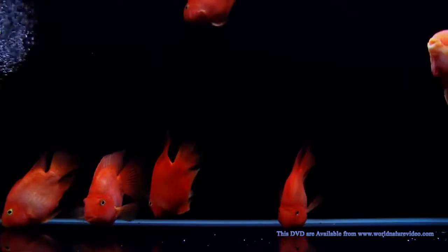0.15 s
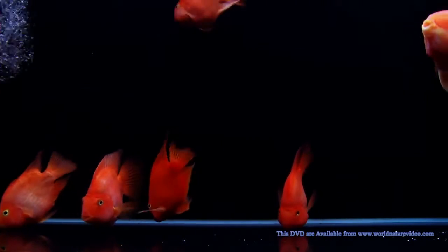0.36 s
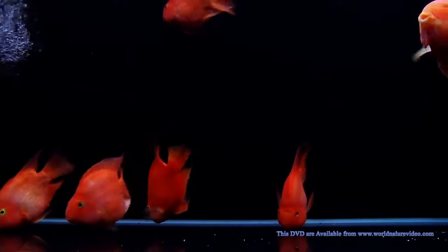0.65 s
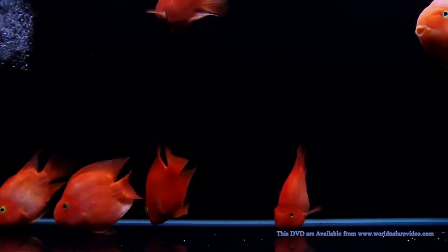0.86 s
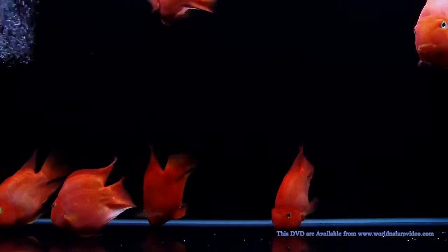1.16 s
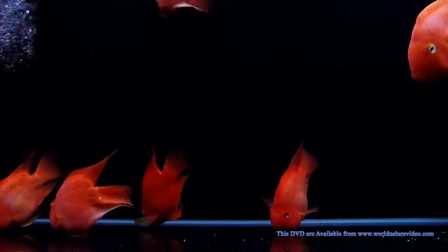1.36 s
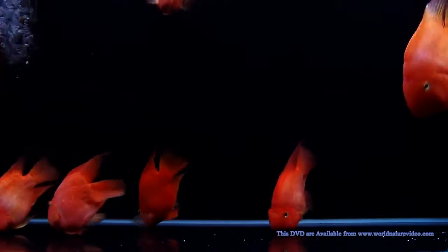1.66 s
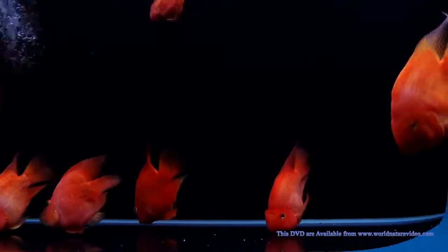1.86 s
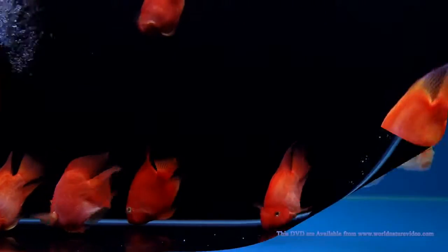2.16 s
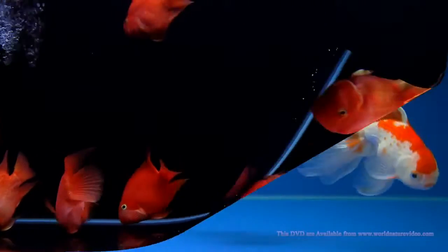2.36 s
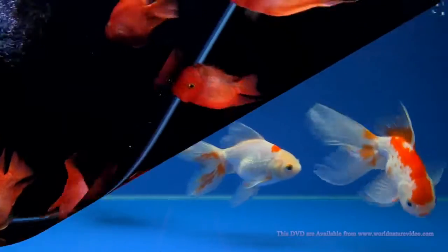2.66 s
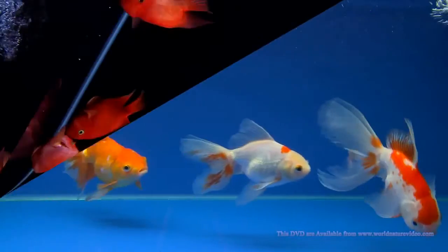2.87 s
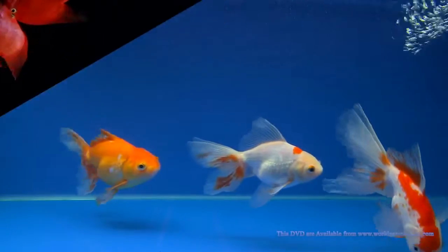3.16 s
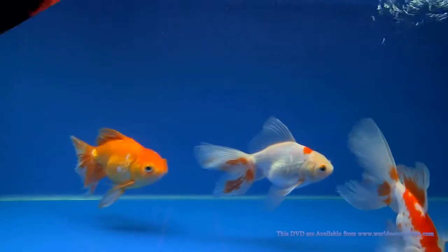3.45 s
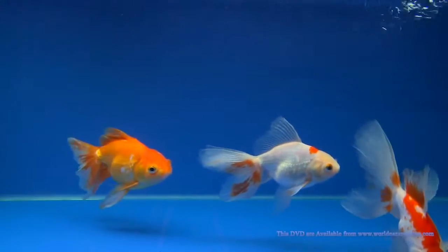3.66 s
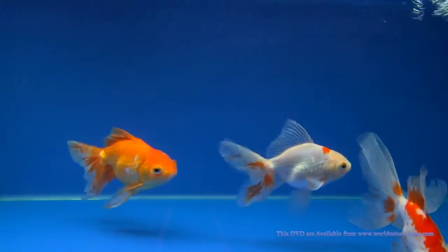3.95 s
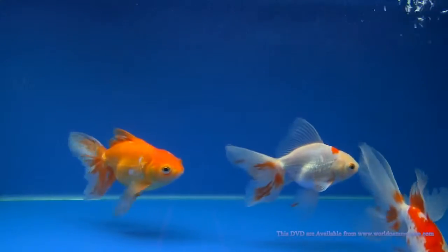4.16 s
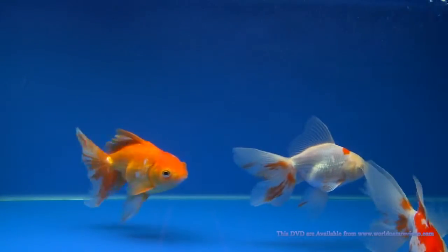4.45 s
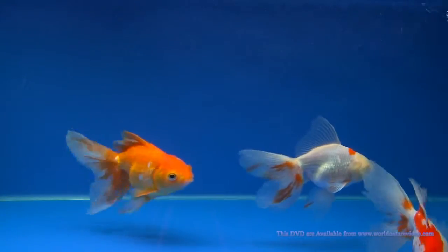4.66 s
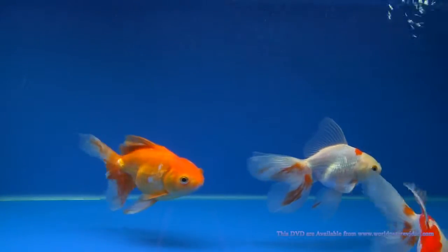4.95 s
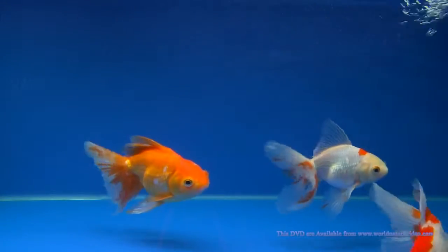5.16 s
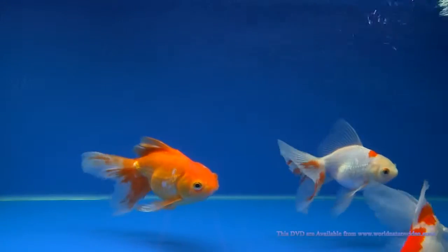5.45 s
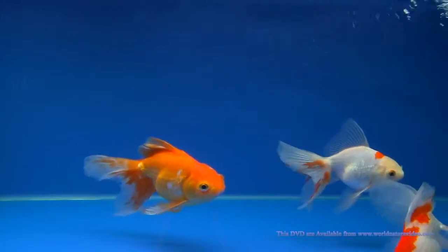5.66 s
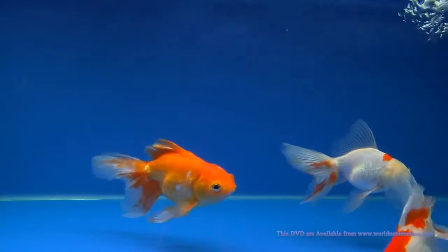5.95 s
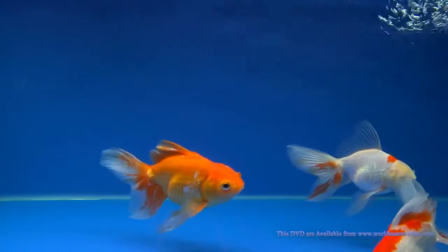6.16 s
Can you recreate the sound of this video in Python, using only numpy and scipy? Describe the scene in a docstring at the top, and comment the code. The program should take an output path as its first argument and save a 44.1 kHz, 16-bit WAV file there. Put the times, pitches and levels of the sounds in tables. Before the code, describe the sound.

A steady stream of air bubbles gurgles through a fish tank, close to the microphone. Quick upward chirping bloops tumble irregularly over one another, filled in by damped plops, little splashy clusters and pinhead plips. Sparse crisp ticks and faint fizz sparkle above. The sound is mid-range and wet, slightly hollow, with brief small-room reflections; pump noise is almost inaudible and the fish themselves make no sound.

```python
"""Large air bubbles rise through an aquarium, heard close: each is a sine whose pitch climbs to the surface.
Damped plops, clusters of small cavities and a crowd of smaller, random bubbles fill the gaps.
Tiny bubbles burst on top: each tick is a damped ping, a resonant noise snap and faint glass modes.
Filtered noise makes the wash, decaying noise the echoes of tank and room, and mains harmonics
over a low rumble make the very faint air pump."""
import sys
import numpy as np
from scipy import signal
from scipy.fft import rfft, irfft
from scipy.io import wavfile

SR = 44100
rng = np.random.default_rng(int(sys.argv[2]) if len(sys.argv) > 2 else 0)


def output_pcm(signal):
    """Save a mono or channel-first signal as 16-bit PCM at the path in sys.argv[1].

    Samples are clipped to [-1, 1] before scaling.
    """
    pcm = np.clip(np.atleast_2d(signal).T, -1, 1) * 32767
    wavfile.write(sys.argv[1], SR, np.round(pcm).astype(np.int16))


N = 277389  # length in samples

# Large bubbles. Each row: start in seconds, rise time in seconds, pitch at the start in Hz,
# pitch at the surface in Hz, level in dB, loudest point as a share of the rise.
RISING_BUBBLES = [(0.0, 0.064, 455, 1203, -17, 0), (0.098, 0.07, 397, 1128, -29.2, 0.42),
                  (0.182, 0.14, 439.6, 1672, -35, 0.0), (0.259, 0.09, 371, 1135, -19, 0.56),
                  (0.262, 0.025, 1027, 1740, -28, 0.33), (0.36, 0.049, 614, 1404, -29.0, 0.49),
                  (0.367, 0.099, 385.0, 1200.0, -31.5, 0.16), (0.458, 0.11, 340, 1610.0, -23.5, 0.27),
                  (0.511, 0.019, 743, 1230, -23, 0.3), (0.573, 0.054, 470, 1174, -32.5, 0.32),
                  (0.671, 0.05, 342, 885, -19.5, 0.51), (0.679, 0.037, 811, 1680, -26, 0.0),
                  (0.82, 0.057, 496, 1116, -20, 0.28), (0.921, 0.13, 454.0, 1880.0, -27.5, 0.0),
                  (1.0, 0.039, 933, 1354, -27, 0.39), (1.022, 0.063, 785, 1046, -22.5, 0.0),
                  (1.082, 0.072, 355, 1217, -21, 0.53), (1.159, 0.136, 368.5, 1186, -30.5, 0.34),
                  (1.258, 0.032, 806, 1500, -27.5, 0.02), (1.265, 0.03, 482.0, 826, -19, 0.29),
                  (1.271, 0.082, 596, 884, -32.5, 0.22), (1.376, 0.079, 619.0, 1760, -37, 0.028),
                  (1.521, 0.035, 535, 1275, -28, 0.0), (1.599, 0.023, 524, 1340, -31, 0.0),
                  (1.6, 0.107, 388, 1400.0, -23.5, 0.39), (1.689, 0.048, 421, 1410, -24.2, 0.54),
                  (1.873, 0.021, 338.0, 2040, -26.5, 0.0), (1.892, 0.079, 384.4, 943, -24.0, 0.31),
                  (1.977, 0.056, 372.4, 780.0, -22.5, 0.51), (2.108, 0.054, 378.0, 1250, -18.5, 0.47),
                  (2.203, 0.064, 355, 1214, -21, 0.45), (2.318, 0.052, 459, 1083, -13.5, 0.0),
                  (2.319, 0.02, 797, 1880, -29.5, 0.34), (2.445, 0.048, 392, 1057, -21, 0.47),
                  (2.52, 0.056, 365, 747, -19.5, 0.54), (2.528, 0.022, 1040, 1720, -27, 0.28),
                  (2.678, 0.077, 428, 1970, -33.5, 0.21), (2.741, 0.064, 411, 575, -23.8, 0.53),
                  (2.809, 0.055, 348.2, 757, -10, 0.57), (2.817, 0.036, 665, 1434, -26, 0.0),
                  (2.861, 0.046, 723, 966, -23, 0.18), (2.951, 0.12, 359, 2060, -30, 0.28),
                  (3.037, 0.075, 439.7, 1110, -17.5, 0.33), (3.052, 0.015, 870, 1370, -22.5, 0.31),
                  (3.155, 0.1, 367, 1247, -25.5, 0.42), (3.257, 0.088, 435, 1650.0, -18.5, 0.32),
                  (3.318, 0.064, 349.4, 885, -23, 0.5), (3.422, 0.051, 504, 1288, -15.7, 0.39),
                  (3.493, 0.065, 410, 1076, -26, 0.2), (3.54, 0.047, 570, 937, -19.5, 0.094),
                  (3.681, 0.05, 457, 1236, -21, 0.16), (3.74, 0.087, 386.6, 1096, -23.5, 0.52),
                  (3.895, 0.29, 792.0, 941, -37.5, 0.0), (3.929, 0.05, 448, 1094, -22.5, 0.39),
                  (4.002, 0.043, 474, 1065, -11.8, 0), (4.062, 0.038, 479, 985, -25.5, 0.23),
                  (4.084, 0.057, 768, 885, -23.5, 0.058), (4.087, 0.029, 954, 1643, -24, 0.12),
                  (4.121, 0.038, 755, 1705, -32, 0.0), (4.142, 0.079, 369, 1080, -21, 0.5),
                  (4.299, 0.053, 475, 1414, -27.5, 0.59), (4.336, 0.053, 441, 882, -22.5, 0.075),
                  (4.416, 0.096, 375, 1085, -19, 0.41), (4.424, 0.022, 910, 1002, -21.5, 0.029),
                  (4.536, 0.077, 340, 995, -24.5, 0.57), (4.661, 0.043, 486, 830, -23.5, 0.0),
                  (4.7, 0.049, 449.0, 1012, -12.5, 0.36), (4.722, 0.028, 636, 1550, -28, 0.44),
                  (4.766, 0.095, 406, 1108, -24, 0.41), (4.859, 0.052, 373.6, 1320, -14.5, 0.49),
                  (5.001, 0.089, 436.6, 1268, -20.5, 0.34), (5.036, 0.09, 367.0, 1227, -24.5, 0.41),
                  (5.172, 0.058, 375.5, 1006, -21.5, 0.48), (5.242, 0.047, 510, 967, -15.5, 0.33),
                  (5.26, 0.08, 413, 1470, -21, 0), (5.376, 0.058, 487.5, 1570, -19.5, 0.44),
                  (5.506, 0.12, 378.5, 1735, -33, 0.49), (5.594, 0.051, 366, 594, -27.4, 0.54),
                  (5.619, 0.086, 399, 1616, -31.5, 0.44), (5.717, 0.059, 378, 1173, -28, 0.47),
                  (5.803, 0.053, 377, 1125, -21, 0.42), (6.001, 0.14, 359, 1610, -28, 0.043),
                  (6.108, 0.086, 343.8, 901, -22, 0.58), (6.231, 0.07, 353.3, 784, -21.3, 0.54)]
# Plops as the surface closes. Each row: start in seconds, level in dB, pitch in Hz.
CLOSING_PLOPS = [(0.296, -22.0, 436), (0.36, -17, 462), (0.998, -17.5, 506), (1.041, -23, 620),
                 (1.261, -10.5, 526), (1.661, -20, 492), (1.76, -24.5, 447), (1.837, -24.8, 409),
                 (1.875, -34, 376), (1.923, -14, 501), (2.059, -24, 509), (2.1, -19, 450),
                 (2.161, -21.5, 448), (2.177, -24.4, 445), (2.262, -17.1, 446), (2.298, -17.5, 470),
                 (2.377, -22, 426), (2.521, -19.4, 548), (2.637, -20.9, 450), (2.657, -21.5, 576),
                 (3.325, -23, 580), (3.483, -21.5, 450), (3.503, -13.5, 494), (3.543, -11, 615),
                 (3.86, -23.5, 457), (4.179, -20, 497), (4.283, -21, 453), (4.316, -20, 510),
                 (4.482, -21.0, 444), (4.543, -13.5, 472), (5.302, -25.5, 543), (5.384, -20.5, 476),
                 (5.483, -23, 464), (5.501, -16.5, 470), (5.643, -19.4, 441), (5.698, -23.7, 444),
                 (5.802, -23.5, 613), (5.862, -23.8, 474), (6.084, -18, 461), (6.101, -24.2, 487),
                 (6.182, -21.5, 490)]
# The nearest tiny bubbles bursting. Each row: start in seconds, level in dB, cavity pitch in Hz.
NEAR_BURSTS = [(0.12, -42.5, 7700), (0.462, -40, 2450), (0.638, -40, 6820), (0.784, -40.5, 2560),
               (0.812, -43, 5860), (0.994, -40.5, 9740), (1.044, -44, 9000), (1.084, -41, 9300),
               (1.094, -41, 10700), (1.129, -35.5, 2200), (1.193, -39, 3530), (1.465, -45, 3180),
               (1.649, -43, 7300), (1.713, -42, 7200), (1.755, -34, 6560), (1.975, -42, 5740),
               (2.103, -57, 5700), (2.16, -43.5, 6070), (2.162, -41, 10500), (2.175, -41, 5200),
               (2.32, -45, 3880), (2.423, -40, 2750), (2.569, -35, 5170), (2.603, -52, 5500),
               (2.654, -48.5, 8900), (2.824, -45.5, 3370), (2.914, -41.5, 5670), (2.914, -43, 8940),
               (2.93, -50, 8400), (3.152, -42.5, 8300), (3.217, -41, 5670), (3.325, -44.5, 5700),
               (3.47, -48, 8200), (3.784, -43.5, 2400), (3.96, -36, 2880), (4.141, -43.5, 5710),
               (4.15, -43, 7500), (4.216, -35.5, 3880), (4.384, -42.5, 3870), (4.835, -39, 8100),
               (4.94, -37.5, 4970), (4.964, -39, 2430), (5.383, -44, 2890), (5.395, -44.5, 7050),
               (5.597, -30.5, 3480), (5.785, -35.5, 2780), (5.801, -47, 5650), (5.817, -44, 3760),
               (5.929, -45, 3450), (6.215, -46.5, 4230)]
# Modes of the glass cover, tapped by the bursts. Each row: frequency in Hz, relative level in dB,
# time to decay by 60 dB in seconds.
GLASS_MODES = [(2165, -17, .04), (2755, -20, .025), (5690, -11, .03)]
# Spectrum of the churned water. Each row: frequency in Hz, relative level in dB per Hz.
WASH_SPECTRUM = [(100, -46), (200, -32), (280, -25), (400, 1), (520, -3), (800, -12), (1300, -23),
                 (2000, -37), (4000, -45), (9000, -50), (15000, -65)]
# Harmonics of the air pump. Each row: frequency in Hz, rms level in dB.
PUMP_HARMONICS = [(100, -88), (150, -93), (300, -70)]
# Colour of the echoes in tank and room. Each row: frequency in Hz, gain in dB.
ECHO_SPECTRUM = [(300, 2), (450, 8.5), (1000, -1), (2000, 4), (4000, 0), (10000, -17)]
# Splashes, each a cluster of small cavities. Each row: start in seconds, level of the first cavity in dB,
# central pitch in Hz.
SPLASH_CLUSTERS = [(0.517, -33, 1120), (0.782, -36.5, 1400), (1.006, -33.5, 1360), (1.129, -27.5, 1793),
                   (1.481, -24, 600), (1.604, -29.5, 800), (1.882, -35.5, 1810), (2.103, -32.5, 1490),
                   (3.322, -29, 1310), (4.423, -37, 1395), (4.939, -42, 1940), (4.964, -38, 1950),
                   (6.016, -29.5, 1510)]
# Liveliness of the foam. Each row: time in seconds, level offset in dB.
FOAM_LIVELINESS = [(0, 6), (1.2, 2.5), (2.2, 7.5), (3.0, 4.5), (4.3, 1.5), (6.29, 8)]

WASH_DB = -45  # rms
TOP_EDGE_HZ = 16000  # the final low-pass is 50 dB down from here up
# a bubble's shape wobbles more as it nears the surface
WOBBLE_SHARE, FLUTTER_DB = 0.021, 3  # share of the pitch; level
# a plop at PLOP_HZ swells in PLOP_SWELL_S; the time falls with the square of the pitch
PLOP_HZ, PLOP_SWELL_S = 502, 0.0028
# a bubble starting at STRAIGHT_HZ climbs evenly; deeper ones speed up, higher ones level off
STRAIGHT_HZ, LEAST_BEND = 600.2, .6
# a bubble loses FALL_DB from its loudest point to the surface, then lingers for a share of its rise time
BUBBLE_ATTACK_S, FALL_DB, LINGER_SHARE = 0.00036, 19, .4


def from_db(db):
    """Decibel law: 20 dB is a tenfold amplitude ratio."""
    return 10 ** (np.asarray(db) / 20)


def rms_one(x):
    """Normalisation by mean power: scale to rms 1."""
    return x / np.sqrt(np.mean(x ** 2) + 1e-20)


def seconds(length):
    """Uniform sampling: the time axis of a given length in seconds."""
    return np.arange(int(length * SR)) / SR


def add(out, s, sound):
    """Linear superposition: mix a sound in at time s."""
    at = int(np.clip(s * SR, 0, N))
    out[at:at + len(sound)] += sound[:N - at]


def cut(x, hz, kind, order=2):
    """Maximally flat filtering: a Butterworth low- or high-pass."""
    sections = signal.butter(order, min(hz, .45 * SR), kind, fs=SR, output="sos")
    return signal.sosfilt(sections, x + 1e-18)


def coloured(x, spectrum):
    """Spectral shaping: weight each frequency by a curve drawn on a logarithmic axis."""
    hz, db = np.transpose(spectrum)
    bins = np.maximum(np.fft.rfftfreq(len(x), 1 / SR), 1)
    gain = from_db(np.interp(np.log(bins), np.log(hz), db))
    return irfft(rfft(x) * gain, len(x))


def chances(per_s, size):
    """Independent random arrivals at a mean rate: rows of a time in seconds and some uniform draws."""
    rows = rng.random((8000, size + 1))[:int(per_s * N / SR)]
    return np.column_stack([rows[:, 0] * N / SR, rows[:, 1:]])


def drift(t, per_s):
    """Random modulation: lines join 64 normal draws at per_s points a second; the last one holds."""
    return np.interp(t * per_s, np.arange(64), rng.standard_normal(64))


def echoes(x, wet_db, t60, delay):
    """Diffuse reverberation: convolution with coloured, decaying noise gives dense reflections."""
    t = seconds(.6)
    tail = rng.standard_normal(len(t)) * np.exp(-np.log(1000) * t / t60) * (t > delay)
    unit_energy = tail / np.sqrt(np.sum(tail ** 2))
    tail = coloured(unit_energy, ECHO_SPECTRUM)
    return from_db(wet_db) * signal.fftconvolve(x, tail)[:N]


def bubble(rise, start_hz, end_hz, db, crest):
    """Added mass: the water load shrinks towards the surface, so the pitch climbs as the bubble rings."""
    t = seconds(rise * (1 + LINGER_SHARE))
    way = t / rise  # 1 at the surface
    crest = np.clip(crest, 0, .75)
    bend = max(STRAIGHT_HZ / start_hz, LEAST_BEND)
    wobble = WOBBLE_SHARE * way * drift(t, 200)
    flutter_db = FLUTTER_DB * way * drift(t, 260)
    hz = (start_hz + (end_hz - start_hz) * way ** bend) * (1 + wobble)
    fall_db = FALL_DB * ((way - crest) / (1 - crest)) ** 2
    swell = from_db(db + flutter_db - fall_db)
    attack = 1 - np.exp(-t / BUBBLE_ATTACK_S)
    release = np.clip((1 + LINGER_SHARE - way) / LINGER_SHARE, 0, 1)
    return swell * attack * release * np.sin(2 * np.pi * np.cumsum(hz) / SR)


def large_bubbles():
    """Volume resonance near the listener: each large bubble sounds one rising glide."""
    out = np.zeros(N)
    for s, rise, start_hz, end_hz, db, crest in RISING_BUBBLES:
        add(out, s, bubble(rise, start_hz, end_hz, db, crest))
    return out


def small_bubbles(top_db=-34, spread_db=12, small_db=-6):
    """Resonance scaling with size: in a crowd of faint glides, smaller bubbles are higher, shorter, weaker."""
    per_s, low_hz, octaves = 36, 380, 1.75
    climb, rise_s, crest = 1.5, .026, .43  # climb is a pitch ratio
    out = np.zeros(N)
    for s, small, strength, pace in chances(per_s, size=3):
        hz = low_hz * 2 ** (octaves * small)
        db = top_db - spread_db * strength + small_db * small
        rise = rise_s * (.5 + pace) * 2 ** (.5 - small)
        add(out, s, bubble(rise, hz, hz * climb, db, crest))
    return out


def plips(top_db=-49, spread_db=13):
    """Small-cavity resonance: pinhead bubbles give brief, high, slightly rising notes."""
    per_s, low_hz, octaves = 55, 1300, 1.5
    cycles, climb, small_db = 11, 1.1, -10
    out = np.zeros(N)
    for s, small, strength, pace in chances(per_s, size=3):
        hz = low_hz * 2 ** (octaves * small)
        lively_db = np.interp(s, *np.transpose(FOAM_LIVELINESS))
        db = top_db - spread_db * strength + small_db * small + lively_db
        add(out, s, bubble(cycles * (.5 + pace) / hz, hz, hz * climb, db, 0))
    return out


def churned_wash():
    """Broadband turbulence noise: steady noise takes the spectrum of churned water."""
    return from_db(WASH_DB) * rms_one(coloured(rng.standard_normal(N), WASH_SPECTRUM))


def pump(rumble_db=-84, rumble_hz=200):
    """Periodic excitation: mains harmonics of random phase over a faint low-passed rumble."""
    t = np.arange(N) / SR
    hum = np.zeros(N)
    for hz, db in PUMP_HARMONICS:
        hum += from_db(db) * np.sqrt(2) * np.sin(2 * np.pi * (hz * t + rng.random()))
    rumble = rms_one(cut(rng.standard_normal(N), rumble_hz, "low"))
    return hum + from_db(rumble_db) * rumble


def burst(db, hz, cycles, snap_db=-7, glass_db=-2):
    """Impulsive excitation: the film snaps, the tiny open cavity pings and the glass rings faintly."""
    t, snap_s, snap_q = seconds(.025), .0013, 3.5
    turns = hz * t
    ping = np.exp(-turns / cycles) * np.sin(2 * np.pi * turns)
    # a two-pole resonance of the same cavity colours the snap
    radius, angle = np.exp(-np.pi * hz / snap_q / SR), 2 * np.pi * hz / SR
    tear = rng.standard_normal(len(t)) * np.exp(-t / snap_s)
    resonance = [1, -2 * radius * np.cos(angle), radius * radius]
    snap = rms_one(signal.lfilter([1, 0, -1], resonance, tear)) * np.sqrt(snap_s / t[-1])
    glass = np.zeros(len(t))
    for mode_hz, level_db, t60 in GLASS_MODES:
        decay = np.exp(-np.log(1000) * t / t60)
        glass += rng.random() ** 2 * from_db(level_db) * decay * np.sin(2 * np.pi * mode_hz * t)
    opening = (1 - np.exp(-turns)) ** 2  # the hole takes a cycle or two to open
    return from_db(db) * opening * (ping + from_db(snap_db) * snap + from_db(glass_db) * glass)


def fizz(near_cycles=7, faint_db=-73, small_db=-7):
    """Superposed impulses: a few near bursts over many faint ticks and pings that come in flurries."""
    per_s, spread_db, low_hz, octaves = 300, 10.5, 1400, 2.95
    flurries_per_s, flurry_db = 10, 3
    out = np.zeros(N)
    for s, db, hz in NEAR_BURSTS:
        add(out, s, burst(db, hz, near_cycles))
    faint = chances(per_s, size=3)
    times = faint[:, 0]
    lively_db = np.interp(times, *np.transpose(FOAM_LIVELINESS))
    lively_db = lively_db + flurry_db * drift(times, flurries_per_s)
    for (s, small, strength, ringing), lively in zip(faint, lively_db):
        # the logarithm makes strong bursts rare
        db = faint_db + lively - spread_db * np.log(strength + .045) + small_db * small
        cycles = 2 ** (1 / 2 + 2 * ringing)
        add(out, s, burst(db, low_hz * 2 ** (octaves * small), cycles))
    out = out + echoes(out, wet_db=-5, t60=.025, delay=.0015)
    return cut(out, 12500, "low", order=3)


def plop(db, hz, swell):
    """Heavily damped resonance: a cavity sounds a few cycles that swell and die."""
    t = seconds(10 * swell)
    envelope = t / swell * np.exp(1 - t / swell)
    return from_db(db) * envelope * np.sin(2 * np.pi * hz * t)


def lapping(per_s=130, top_db=-33, spread_db=14, low_hz=410, octaves=2.495, small_db=-13):
    """Random cavity resonance: the stirred surface gives faint plops, most of them low."""
    swell_s = .0036  # at the lowest pitch
    out = np.zeros(N)
    for s, small, strength in chances(per_s, size=2):
        ratio = 2 ** (octaves * small ** 2)
        db = top_db - spread_db * strength + small_db * small ** 2
        add(out, s, plop(db, low_hz * ratio, swell_s / ratio))
    return out


def closing_plops():
    """Cavity closure: each plop rings as the surface closes, and lower ones last longer."""
    out = np.zeros(N)
    for s, db, hz in CLOSING_PLOPS:
        add(out, s, plop(db, hz, PLOP_SWELL_S * (PLOP_HZ / hz) ** 2))
    return out


def splashes(length=0.021, fade_db=16):
    """Fragmentation: a bubble breaks into a quick, fading run of nine smaller ones of random pitch."""
    octaves, swell_s = .6, .0012
    out = np.zeros(N)
    for s, db, hz in SPLASH_CLUSTERS:
        lateness = np.linspace(0, 1, num=9) ** 1.5
        for late, small in zip(lateness, rng.random(size=9)):
            pitch = hz * 2 ** (octaves * (small - .5))
            add(out, s + length * late, plop(db - fade_db * late, pitch, swell_s))
    return out


def scene(bass_hz=340, glide_top_hz=1700, room_db=-16):
    """Radiation limits: glides die out high up, and so small a surface radiates little bass."""
    glides = large_bubbles() + closing_plops() + small_bubbles()
    glides = cut(glides, glide_top_hz, "low", order=6)
    water = glides + lapping() + splashes() + plips() + fizz()
    water = water + echoes(water, room_db, t60=.22, delay=.0046)
    water = cut(water, bass_hz, "high", order=10)
    return (water + churned_wash() + pump())[None]


def record(dry, thud_db=-11):
    """Even-order distortion: lopsided large swings put a faint thud under themselves; the top is cut."""
    thud = cut(dry ** 4, 150, "low")
    bent = dry + from_db(thud_db) * thud
    return signal.sosfilt(signal.cheby2(12, 50, TOP_EDGE_HZ, fs=SR, output="sos"), bent)


dry = scene()
out = record(dry)
output_pcm(out)
```